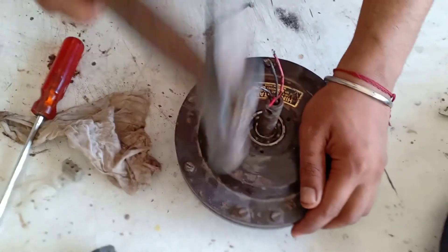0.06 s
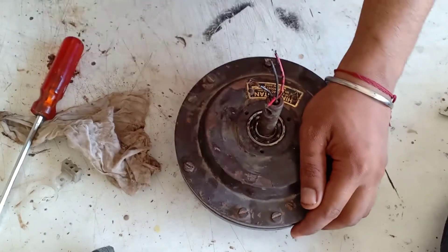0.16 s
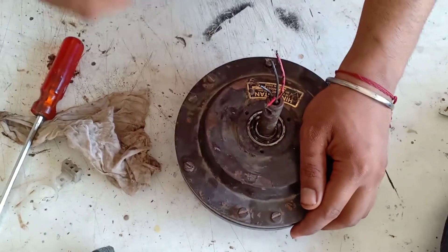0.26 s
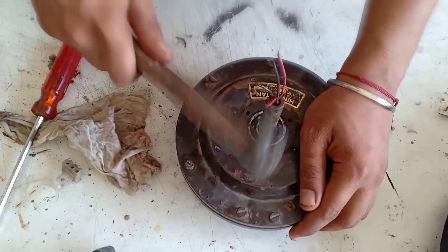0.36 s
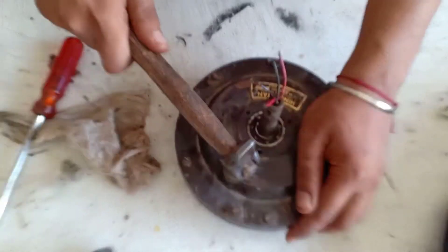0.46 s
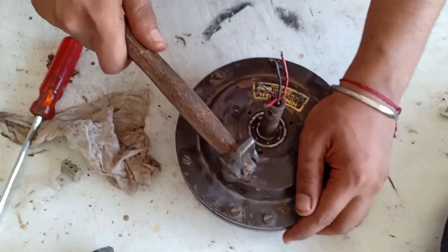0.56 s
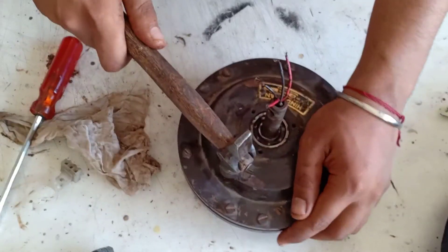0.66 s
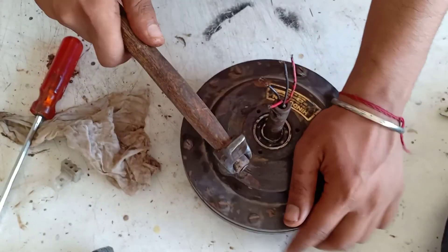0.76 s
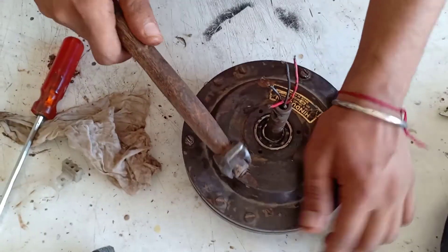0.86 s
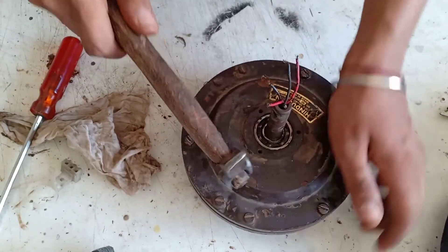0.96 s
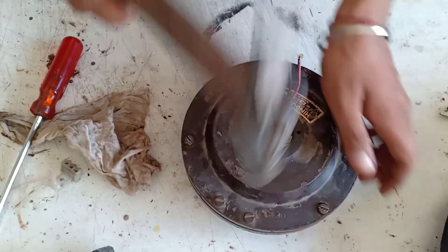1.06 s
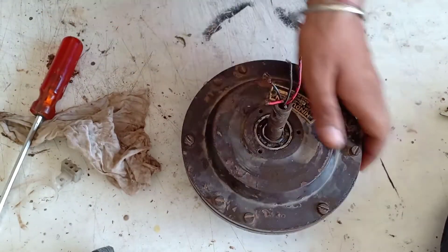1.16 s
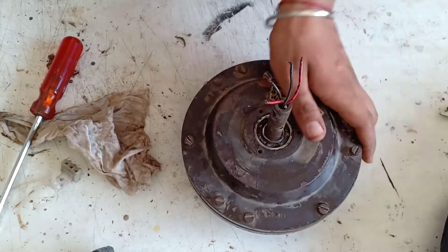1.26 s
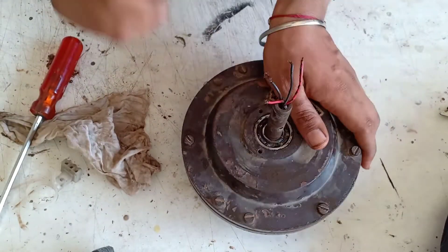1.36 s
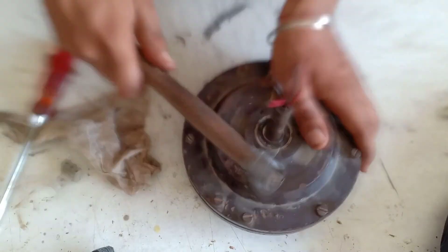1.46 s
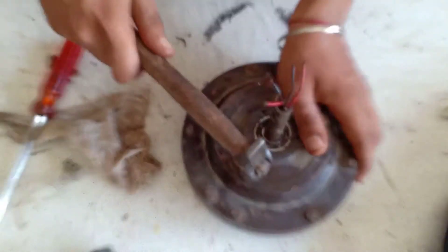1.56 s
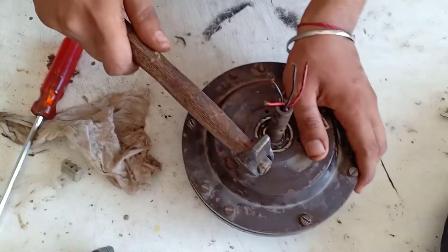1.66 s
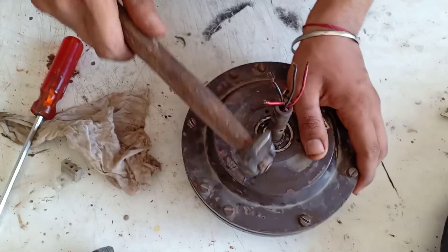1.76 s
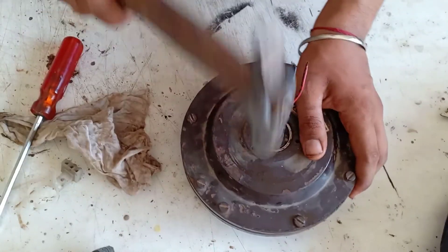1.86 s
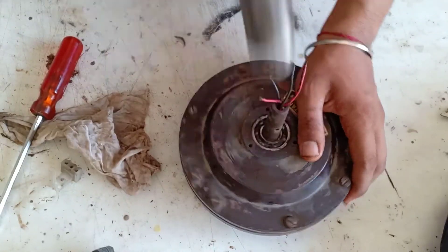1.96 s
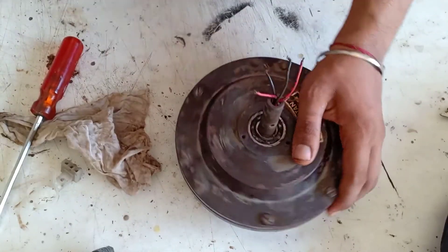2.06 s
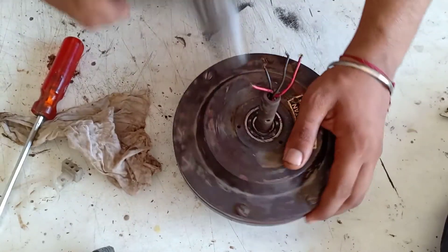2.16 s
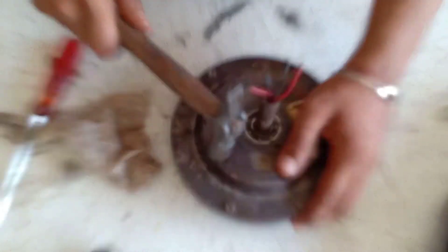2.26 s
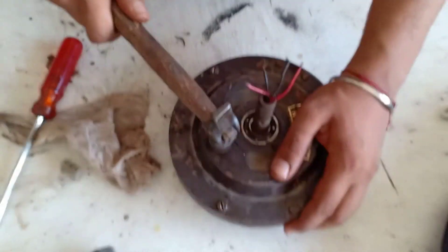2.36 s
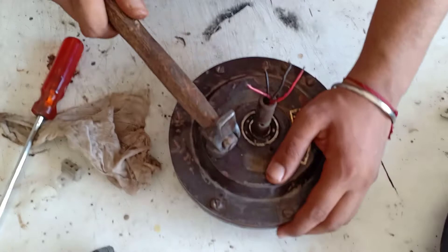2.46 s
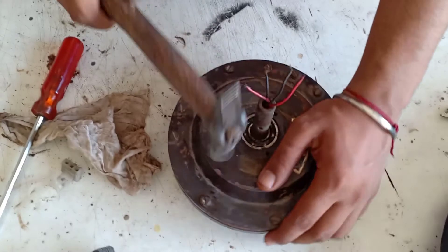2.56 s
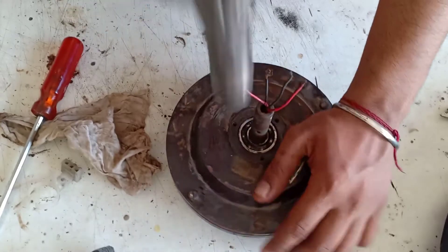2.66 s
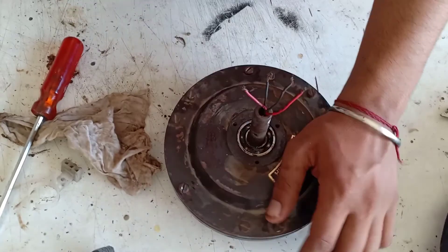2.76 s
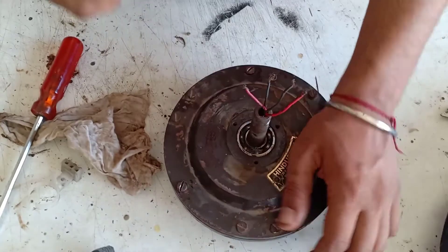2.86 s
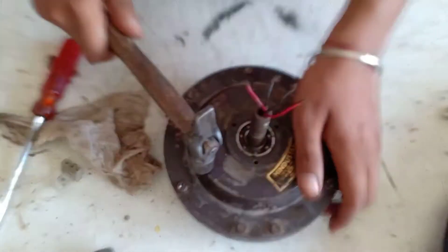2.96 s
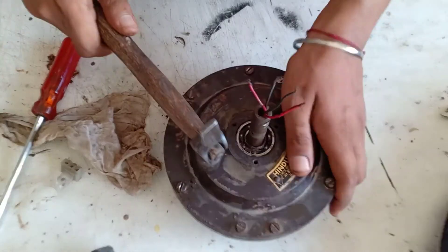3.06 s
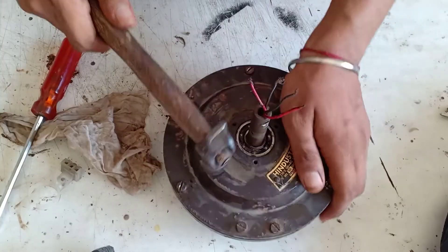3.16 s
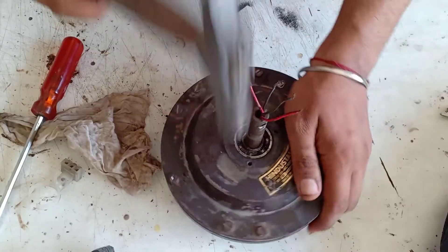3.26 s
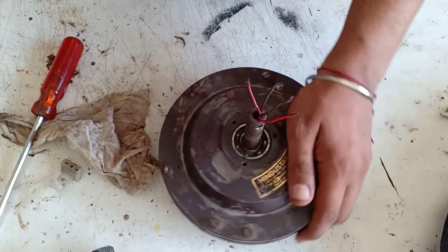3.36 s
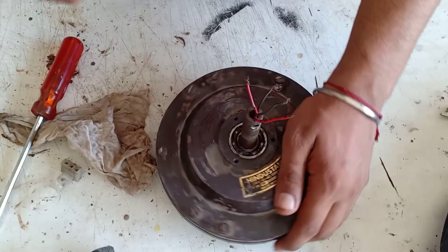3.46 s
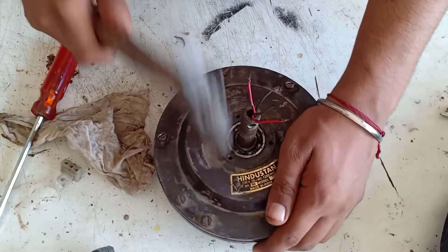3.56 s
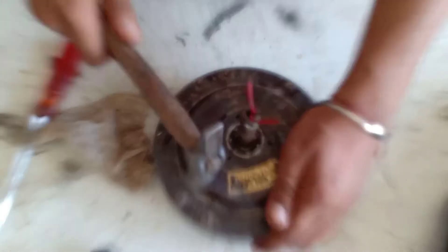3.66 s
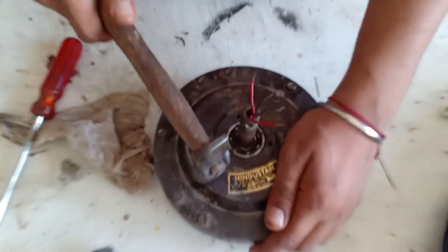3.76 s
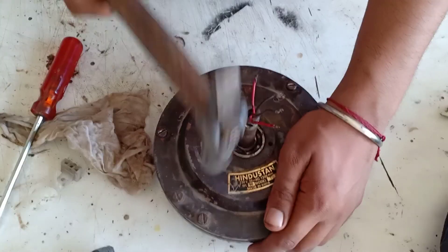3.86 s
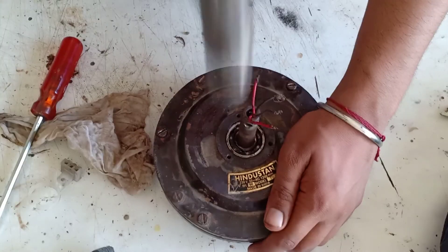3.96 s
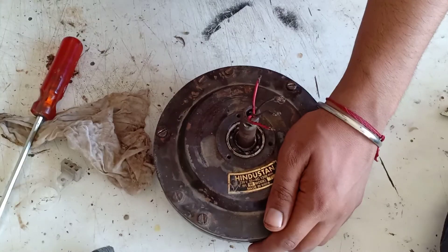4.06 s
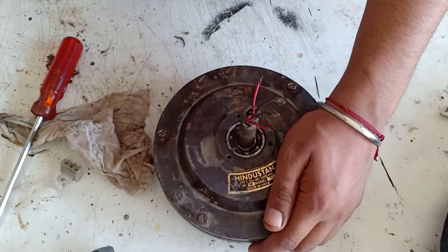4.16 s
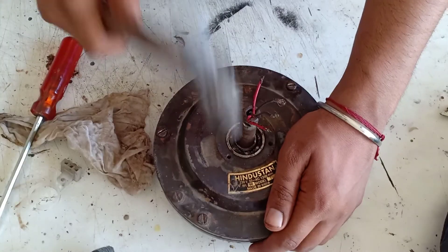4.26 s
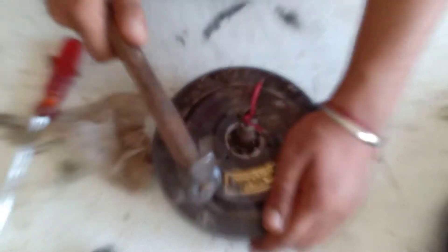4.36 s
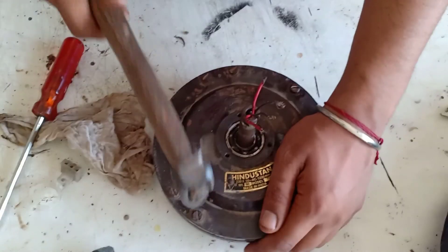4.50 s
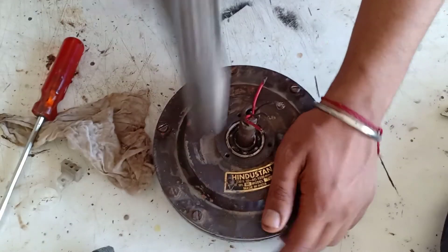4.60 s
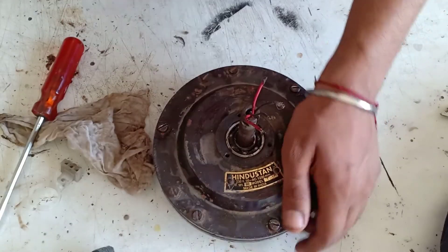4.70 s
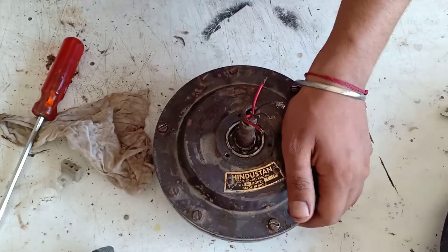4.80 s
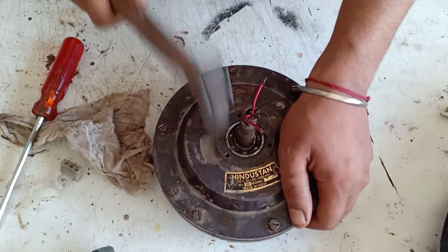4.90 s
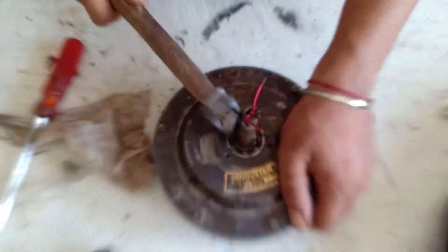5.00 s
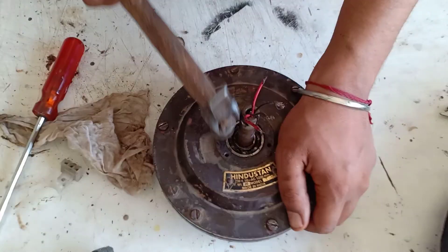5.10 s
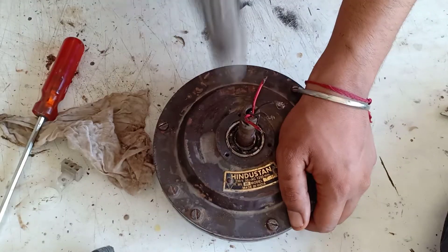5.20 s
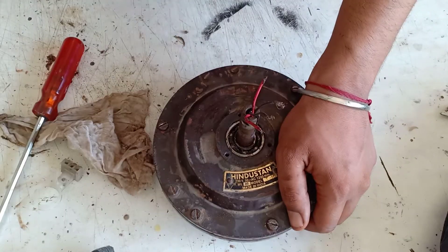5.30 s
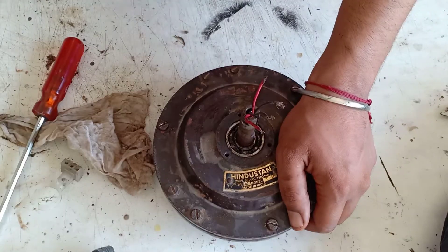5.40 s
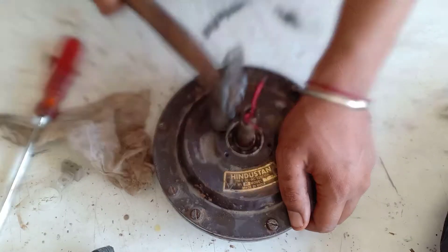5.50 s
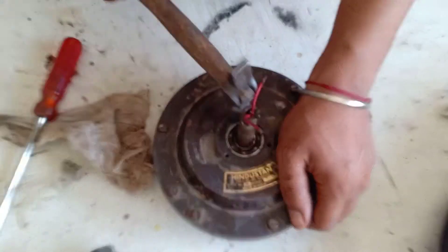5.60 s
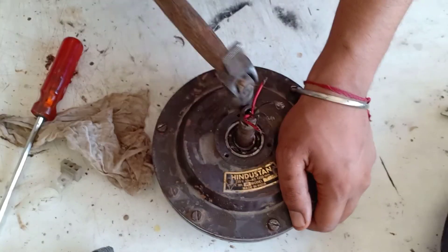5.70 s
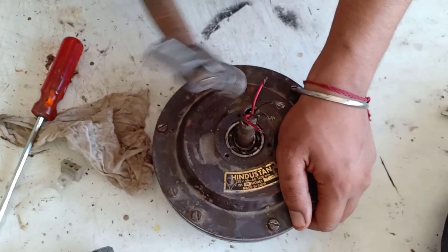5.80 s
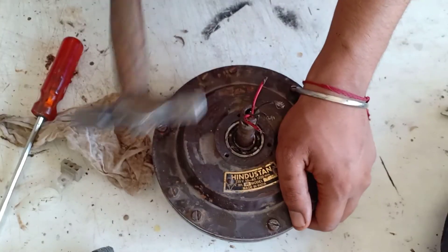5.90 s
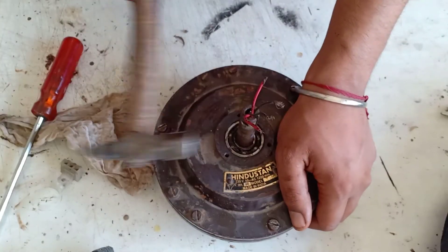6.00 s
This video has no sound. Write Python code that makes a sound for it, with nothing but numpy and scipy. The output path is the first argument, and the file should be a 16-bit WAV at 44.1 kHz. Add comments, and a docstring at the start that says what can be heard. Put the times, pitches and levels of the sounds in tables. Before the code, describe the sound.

Close up, a hammer hits the steel cover of a motor on a workbench, one hard clank at a time with a low bench thump and thin ringing. Eight blows over about six seconds, the last two duller and nearer the hub. A bare room answers with short bright echoes. Between blows come faint rubs, a tiny squeak and light ticks as the hand shifts the motor, over quiet air and low hum.

```python
"""Hammer on a motor cover, bare room

A hammer taps the steel end cover of a hand-held fan motor on a workbench: seven blows on the plate, two by the hub.
Each is a noise burst through the resonances of the cover, with damped sines for the bench and echoes for the room.
Between blows, faint filtered noise, a thin squeak and ticks as the hand shifts the motor; below, air and hum.
Close microphone, limited, on the left channel; the right carries only a faint, blurred leak of it.
"""
import sys
import numpy as np
from scipy import signal
from scipy.fft import rfft, irfft, next_fast_len
from scipy.io import wavfile
from scipy.ndimage import uniform_filter1d, minimum_filter1d, map_coordinates

SR = 44100
rng = np.random.default_rng(int(sys.argv[2]) if len(sys.argv) > 2 else 0)


def master(y):
    """Save y as 16-bit WAV."""
    cut = np.clip(np.atleast_2d(y).T, -1, 1)
    pcm = np.round(cut * 32767)  # scale
    wavfile.write(sys.argv[1], SR, pcm.astype(np.int16))


N = 266364
LEAD = SR // 2  # samples of run-up before time zero
TIME = np.arange(SR) / SR  # s
HZ = np.fft.rfftfreq(SR, 1 / SR)

# hammer blows: t/s, force/dB, place (0 plate, 1 hub), hollowness/dB, clank resonance/dB
BLOWS = [(-.135, 30, 0, 5.5, 5.5), (0.4685, 28, 0, 5, 4.5), (1.4972, 28, 0, 4, 12.5), (2.2869, 27, 0, 1, 9),
         (3.0094, 26.5, 0, -1, 11.5), (3.706, 27.5, 0, -2, 5.5), (4.3542, 29.5, 0, 0.5, 3.5),
         (5.0098, 24.5, 1, 0, 11), (5.5524, 24.5, 1, 1, 8.5)]
# how the cover answers on the plate, then by the hub: clank f/Hz, clank width/Hz, steel ring level/dB
PLACES = [(3400, 230, -3), (2050, 580, -5.5)]
# clank spectrum of the cover struck on the plate: f/Hz, level/dB
PLATE_CLANK = [(30, -30.5), (62, -5), (130, -0.5), (450, 1.5), (650, -3.5), (1550, -5.5), (1800, 0),
               (2900, -2.5), (5000, -11), (5400, -20), (7500, -32), (9600, -38), (11600, -31.5),
               (14000, -34.5), (15000, -42)]
# clank spectrum of the cover struck by the hub: f/Hz, level/dB
HUB_CLANK = [(30, -32), (70, -4.5), (200, 2.5), (450, 4.5), (650, 0), (1450, -1.5), (2600, 1.5),
             (3500, -10.5), (4300, -7.5), (6000, -18.5), (6800, -18), (7700, -32.5), (12000, -29.5),
             (14000, -31), (15000, -43)]
# thin ringing of the steel: f/Hz, relative level/dB, t60/s
STEEL_MODES = [(1900, -38, 0.27), (3490, -37, 0.27), (3380, -35, 0.33), (3350, -36.5, 0.34),
               (3440, -36.5, 0.52), (3420, -39.5, 0.36), (3460, -34, 0.17), (4680, -40.5, .17)]
# the bench gives under the motor: f/Hz, relative level/dB, t60/s
BENCH_THUD = [(168, -2.5, 0.029), (240, -16, 0.026)]
# standing waves of the room and the bench top: f/Hz, relative level/dB, t60/s
BOOM_MODES = [(51.4, -46.5, 1), (97.7, -33.5, 0.69), (151.7, -27, 0.72), (181.3, -25.5, 0.55),
              (202.5, -25, 0.58), (239.6, -35, 0.56), (312.3, -26, 0.36), (386.7, -19.5, 0.39),
              (428, -37, 0.82), (610, -36, 0.64), (648, -29.5, 0.23), (713.6, -25.5, 0.35)]
# first echoes off the walls: delay/s, gain (linear)
WALL_ECHOES = [(0.015, 0.07), (0.0173, 0.21), (0.028, 0.07), (0.047, 0.13), (0.051, 0.16)]
# late decay of the room: f/Hz, t60/s
ROOM_DECAY = [(80, .7), (250, 0.45), (1000, 0.54), (2200, 0.57), (4500, 0.57), (8000, 0.57), (14000, 0.43)]
# rubs as the hand shifts the motor: t/s, length/s, level/dB, centre f/Hz, width/Hz
RUBS = [(2.023, 0.25, -73, 2530, 3780), (2.043, 0.22, -66, 585, 600), (2.702, 0.38, -69, 1870, 3460),
        (3.638, 0.0545, -73, 2990, 702), (4.93, 0.059, -67.5, 2970, 706)]
# thin squeaks of the shifted motor: t/s, length/s, level/dB, pitch f/Hz
SQUEAKS = [(2.801, 0.15, -61.5, 2970), (2.822, 0.12, -81, 4490), (4.902, 0.088, -75, 2980)]
# light touches of metal: t/s, level/dB
TICKS = [(2.08, -22.5), (2.847, -27), (4.859, -30), (4.934, -32), (4.965, -35), (4.997, -34)]
# spectrum shape of the room air: f/Hz, relative level per Hz/dB
AIR_SPECTRUM = [(25, -32), (50, -12), (80, -4.5), (110, -1.5), (130, -11.5), (160, -3), (210, -10.5),
                (290, -16), (550, -16.5), (1200, -23.5), (1800, -22), (4000, -30.5), (6000, -42),
                (15000, -43.5)]
# steady hum tones: f/Hz, rms level/dB
HUM_TONES = [(100, -79), (151, -72.5), (430, -86)]
# leak into the right channel: f/Hz, gain/dB
LEAK_GAIN = [(60, -36.5), (250, -38.5), (1000, -43.5), (2500, -50), (5000, -47.5), (9000, -30),
             (14000, -28.5)]

USUAL_DB = 29  # force of an ordinary blow
# bench thump of an ordinary blow with no hollowness; dB more per dB of force, per dB of hollowness
THUMP_DB, THUMP_PER_FORCE, THUMP_PER_HOLLOW = -0.37, 0.43, 0.41
BRIGHT_DB, BRIGHT_PER_HOLLOW = 0.43, 0.071  # clank tilt, dB per octave; more per dB of hollowness
RING_PER_FORCE = 0.45  # dB more steel ring per dB of force
HEAD_HZ, HEAD_WIDTH_HZ, HEAD_DB = 13150, 320, 7  # the hammer head sings briefly
AIR_DB, AIR_FADE_DB_PER_S = -62.5, 0.4  # air level at time zero; it slowly grows quieter
TOP_HZ = 15400  # band limit of both channels


def hammer(direct_bass_db=-7, direct_db=-1.0, direct_top_db=4, renew=0.84,
           hollow_hz=850, hollow_width_hz=500, bench_lag_s=0.003):
    """Each blow clanks and rings the cover, thumps the bench and sets off the room."""
    track = np.zeros(LEAD + N)
    shared_tail = room_tail()
    # the small cover beams its treble at the close microphone
    near = causal(along([(700, direct_bass_db), (2200, direct_db), (8000, direct_top_db)], HZ))
    for s, force_db, place, hollow_db, clank_db in BLOWS:
        by_hub = place > 0.5
        extra_db = force_db - USUAL_DB
        clank_hz, width_hz, ring_db = PLACES[int(by_hub)]

        # spot and hardness of the blow decide how strongly each resonance answers
        resonances = clank_db * bell(HZ, clank_hz, width_hz)
        resonances = resonances + hollow_db * bell(HZ, hollow_hz, hollow_width_hz)
        resonances = resonances + HEAD_DB * bell(HZ, HEAD_HZ, HEAD_WIDTH_HZ)
        body = cover_body(by_hub, hollow_db)
        steel = ring(STEEL_MODES, attack=0.0008, scatter_db=1.5)
        cover = causal(force_db + body + resonances) + amp(ring_db + RING_PER_FORCE * extra_db) * steel

        direct = signal.fftconvolve(contact(length=0.0051), near)[:SR]
        early = wall_echoes(direct)
        # the hammer lands on a new spot each time, so the late echoes partly change
        late = np.cos(renew) * shared_tail + np.sin(renew) * room_tail()
        add(track, s, signal.fftconvolve(cover, direct + early + late)[:SR])
        add(track, s + bench_lag_s, bench_thump(extra_db, hollow_db))
    return track


def cover_body(by_hub, hollow_db, ripple_db=1.36):
    """Broad clank spectrum in dB of the cover at the struck place; hollower blows are also brighter."""
    octaves = np.log2(np.clip(HZ, 500, 5000) / 2000)  # the tilt pivots at 2 kHz
    bright_db = BRIGHT_DB + BRIGHT_PER_HOLLOW * hollow_db
    spectrum = along(HUB_CLANK if by_hub else PLATE_CLANK, HZ)
    return spectrum + bright_db * octaves + ripple_db * ripple()


def ripple(spacing_hz=70):
    """Random peaks and dips left by the many weak, damped modes of the cover, weaker in the bass."""
    knots = rng.standard_normal(SR // 8)
    return map_coordinates(knots, [HZ / spacing_hz], mode="nearest") * HZ / (HZ + 1500)


def contact(length=0.0054, rise=0.00031):
    """Steel chatters on steel for a few milliseconds: a noise burst of energy 1, spectrum nearly even."""
    gate = np.exp(-(TIME / length) ** 2) * (1 - np.exp(-TIME / rise))
    burst = rng.standard_normal(SR) * gate
    for _ in range(2):  # level the spectrum, then gate again
        phase = np.angle(rfft(burst))
        burst = irfft(np.exp(1j * phase)) * gate
    return burst / np.linalg.norm(burst)


def ring(modes, attack, scatter_db):
    """Modes as exponentially damped sines, at slightly new strengths for each blow."""
    total = np.zeros(SR)
    for hz, db, t60 in modes:
        decay = amp(db + scatter_db * rng.standard_normal() - 60 * TIME / t60)
        total += decay * np.sin(2 * np.pi * hz * TIME)
    return (1 - np.exp(-TIME / attack)) * total


def bench_thump(extra_db, hollow_db):
    """Bench thud and room boom as damped sines; hard, hollow blows pass more of their push to the bench."""
    thump_db = THUMP_DB + THUMP_PER_FORCE * extra_db + THUMP_PER_HOLLOW * hollow_db
    thud = ring(BENCH_THUD, attack=0.0042, scatter_db=3.0)
    boom = ring(BOOM_MODES, attack=0.0017, scatter_db=0.5)
    return amp(thump_db) * (thud + boom)


def wall_echoes(direct):
    """First reflections: delayed, weaker copies of the direct sound."""
    early = np.zeros(SR)
    for delay, gain in WALL_ECHOES:
        early += gain * np.pad(direct, (round(delay * SR), 0))[:SR]
    return early


def room_tail(build=0.0032):
    """Dense wall echoes of energy 1, as noise whose frequencies each die at their own speed."""
    hz, t, bins = signal.stft(rng.standard_normal(SR), SR, nperseg=256)
    decay = amp(-60 * t / along(ROOM_DECAY, hz)[:, None])
    tail = signal.istft(bins * decay, SR, nperseg=256)[1][:SR]
    tail = tail * (1 - np.exp(-(TIME / build) ** 2))  # the echoes take a moment to build up
    return tail / np.linalg.norm(tail)


def handling(touch_db=-4, flutter_hz=90):
    """Faint rubs (band noise), thin squeaks (fluttering sines) and metal ticks as the motor is turned."""
    track = np.zeros(LEAD + N)
    for s, length, db, centre_hz, width_hz in RUBS:
        fade = signal.windows.tukey(int(length * SR), 0.5)
        noise = rng.standard_normal(len(fade))
        rub = unit(filtered(noise, lambda hz: bell(hz, centre_hz, width_hz)))
        add(track, s, amp(db) * rub * fade)
    for s, length, db, hz in SQUEAKS:
        fade = signal.windows.tukey(int(length * SR), 0.5)
        flutter = unit(uniform_filter1d(rng.standard_normal(len(fade)), size=70))
        pitch = hz + flutter_hz * flutter
        squeak = unit(np.sin(2 * np.pi * np.cumsum(pitch) / SR))
        add(track, s, amp(db) * fade * squeak)
    for s, db in TICKS:
        plate = causal(db + along(PLATE_CLANK, HZ))
        touch = amp(touch_db) * contact() + room_tail()  # direct sound, then the room
        add(track, s, signal.fftconvolve(plate, touch)[:SR])
    return track


def workshop(waver=0.54):
    """Quiet room air as shaped noise, with hum tones whose phase drifts at random (waver in radians)."""
    t = np.arange(-LEAD, N) / SR
    air = unit(filtered(rng.standard_normal(len(t)), lambda hz: amp(along(AIR_SPECTRUM, hz))))
    hum = np.zeros(len(t))
    for hz, db in HUM_TONES:
        drift = map_coordinates(rng.standard_normal(64), [(t - t[0]) * 8])  # 8 knots per second
        hum += amp(db) * np.sqrt(2) * np.sin(2 * np.pi * hz * t + waver * drift)
    return amp(AIR_DB - AIR_FADE_DB_PER_S * t) * air + hum


def limiter(x, threshold_db=-6, release_db_per_s=60):
    """The gain ducks under loud blows and creeps back; a quicker dip catches the remaining peaks."""
    ahead = SR // 500  # 2 ms window
    level_db = 10 * np.log10(np.abs(uniform_filter1d(x ** 2, ahead)) + 1e-12)
    needed_db = minimum_filter1d(np.minimum(threshold_db - level_db, 0), ahead)
    # the lowest gain so far holds, rising in a straight line in dB
    recovery_db = release_db_per_s * np.arange(len(x)) / SR
    gain_db = np.minimum.accumulate(needed_db - recovery_db) + recovery_db
    held = x * amp(uniform_filter1d(gain_db, ahead))
    dip = minimum_filter1d(1 / np.maximum(np.abs(held) / 0.88, 1), ahead // 2)
    return held * uniform_filter1d(dip, ahead // 2)


def amp(db):
    """Decibels to gain."""
    return 10 ** (np.asarray(db) / 20)


def unit(x):
    """Scale to rms 1."""
    return x / np.sqrt(np.mean(x ** 2) + 1e-20)


def along(points, hz):
    """Read (f/Hz, value) points on a log frequency axis."""
    f, value = np.transpose(points)
    return np.interp(np.log(hz + 1), np.log(f), value)


def bell(hz, centre, width):
    """Height 0-1 of a resonance."""
    return 1 / (1 + (2 * (hz - centre) / width) ** 2)


def filtered(x, response):
    """Filter x by a gain that is a function of frequency."""
    m = next_fast_len(x.shape[-1] + SR // 2)
    spectrum = rfft(x, m) * response(np.fft.rfftfreq(m, 1 / SR))
    return irfft(spectrum, m)[..., :x.shape[-1]]


def causal(db):
    """The most compact (minimum-phase) impulse response with these levels on the HZ grid."""
    cepstrum = irfft(np.log(amp(db)))
    fold = np.r_[1, np.full(SR // 2 - 1, 2), np.zeros(SR // 2)]
    return irfft(np.exp(rfft(cepstrum * fold)))


def add(track, s, sound):
    """Mix a sound into the track at a time in seconds."""
    start = max(LEAD + round(s * SR), 0)
    part = track[start:start + len(sound)]
    part += sound[:len(part)]


def scene():
    """Everything reaches one close microphone, on the left channel; the right is silent so far."""
    sound = (hammer() + handling() + workshop())[LEAD:]
    return np.array([sound, np.zeros(N)])


def record(dry):
    """The limiter holds the blows down; a blurred trace leaks to the right; a steep band limit ends both."""
    left = limiter(dry[0])
    blur = signal.fftconvolve(left, contact(length=0.06))[:N]
    trace = 0.4 * left + 0.9 * blur
    right = dry[1] + filtered(trace, lambda hz: amp(along(LEAK_GAIN, hz)))
    return filtered(np.array([left, right]), lambda hz: 1 / (1 + (hz / TOP_HZ) ** 80))


dry = scene()
out = record(dry)
master(out)
```